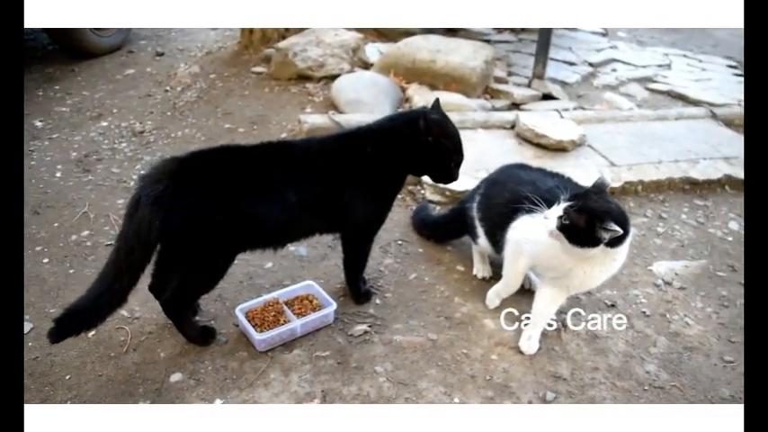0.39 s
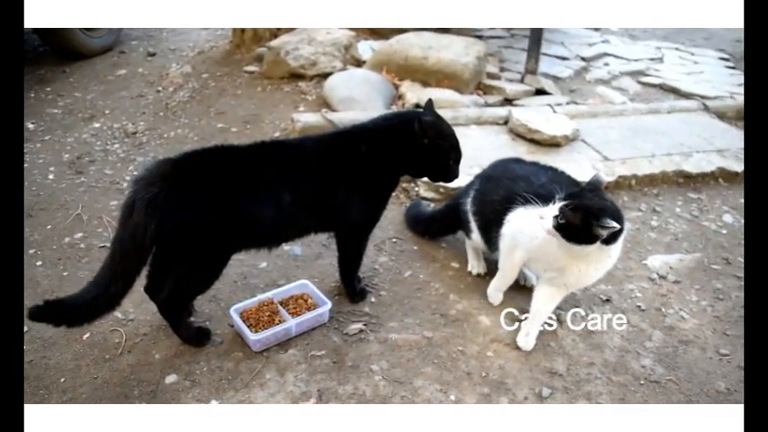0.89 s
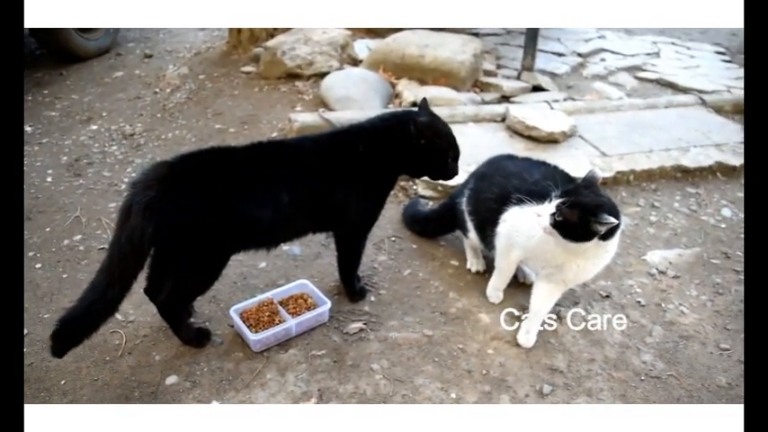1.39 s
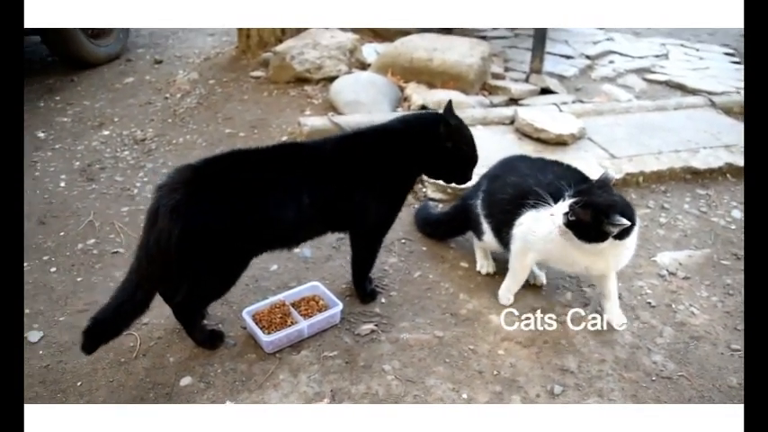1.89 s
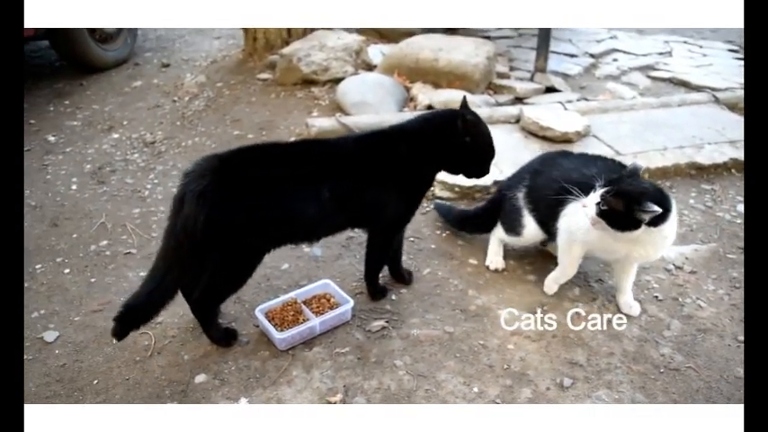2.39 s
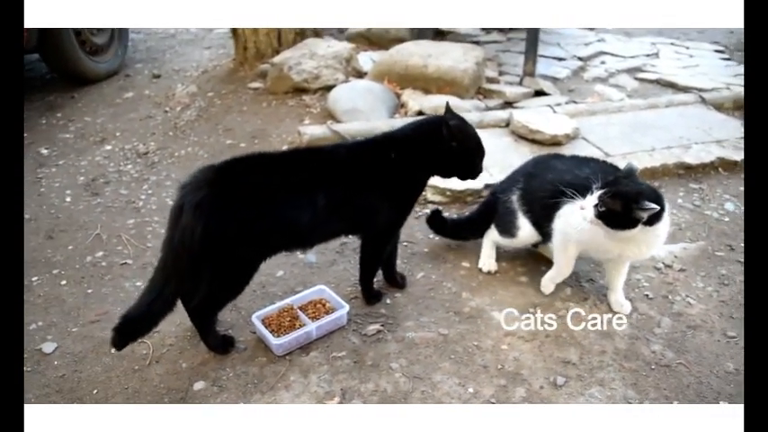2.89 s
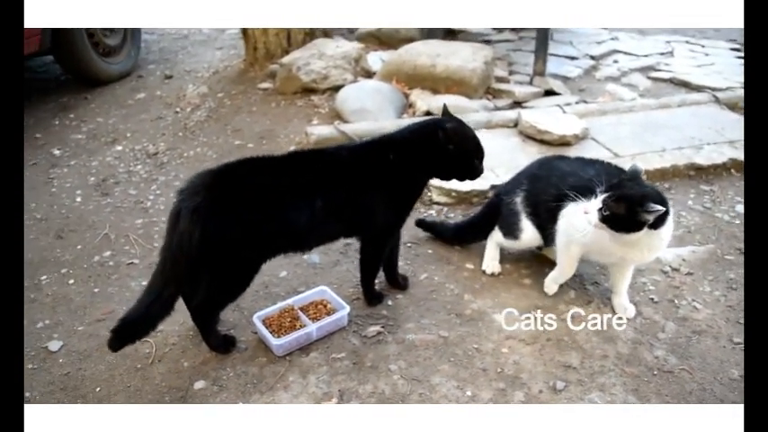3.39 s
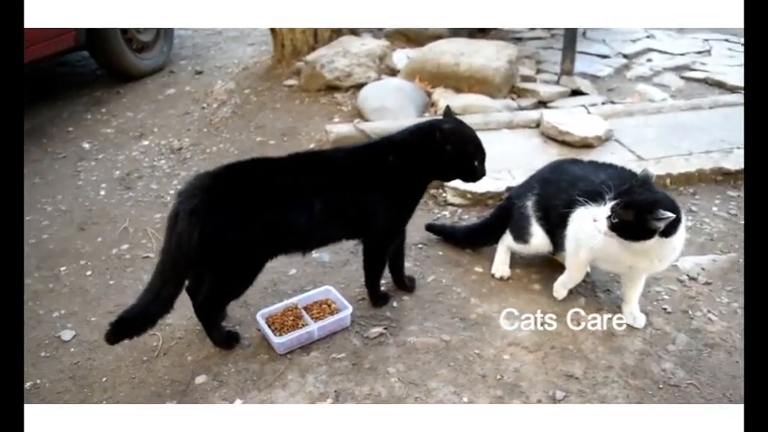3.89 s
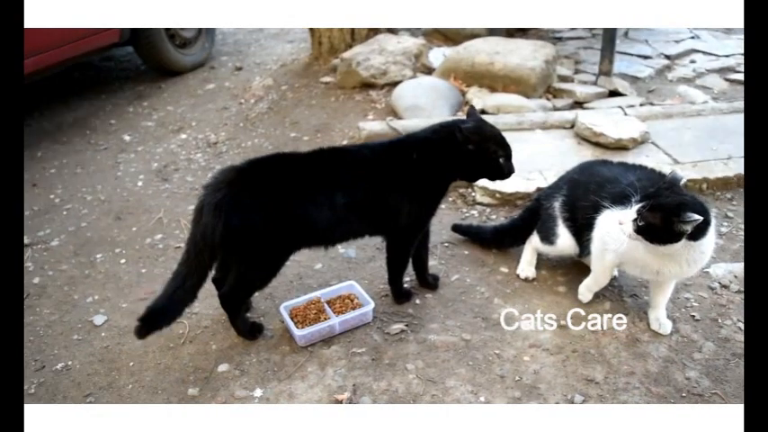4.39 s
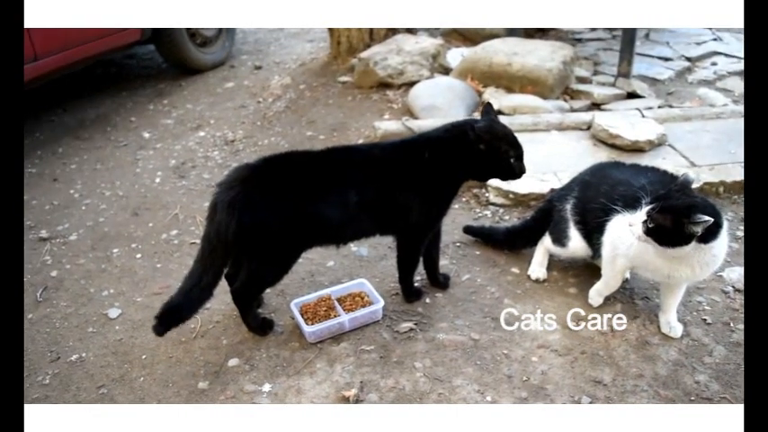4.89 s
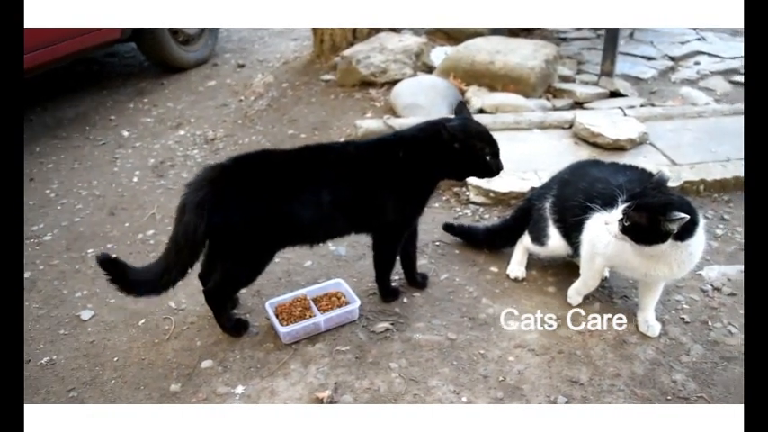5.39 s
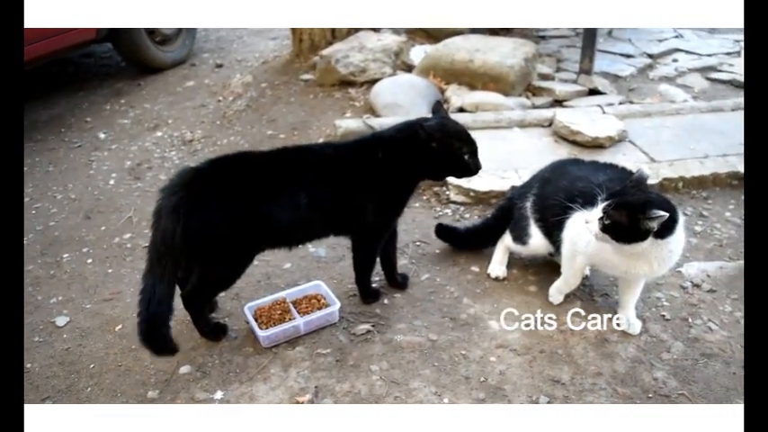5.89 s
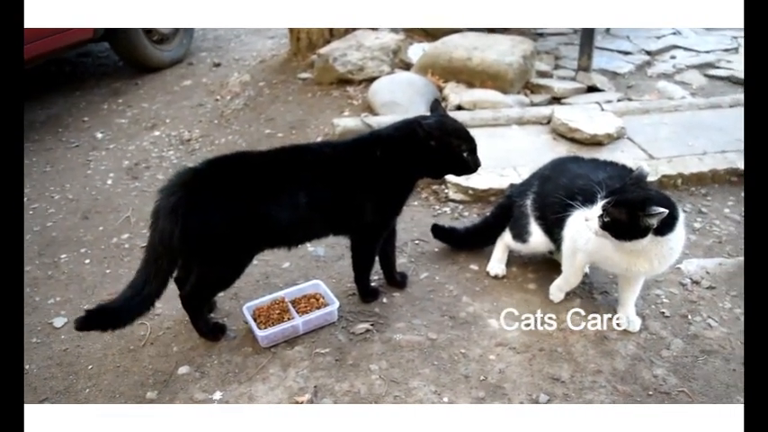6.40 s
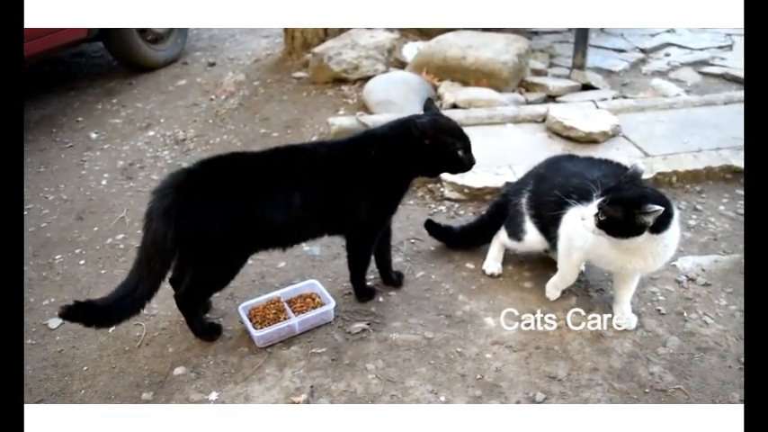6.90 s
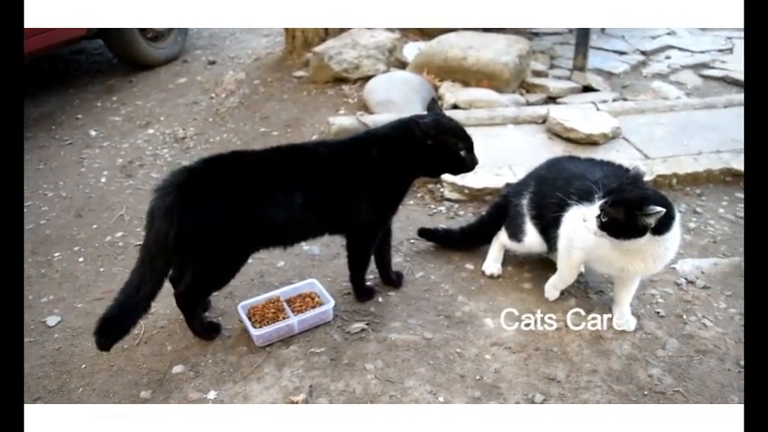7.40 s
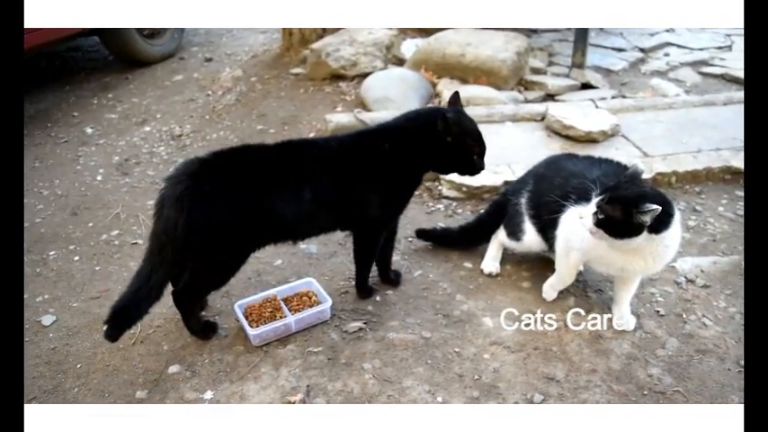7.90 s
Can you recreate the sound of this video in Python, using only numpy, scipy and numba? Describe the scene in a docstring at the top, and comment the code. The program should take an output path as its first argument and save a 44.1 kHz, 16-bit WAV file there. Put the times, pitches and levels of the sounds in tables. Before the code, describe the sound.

A cat's harsh, strained yowl falls away close by, then longer rising and falling calls follow with quiet gaps in an open yard.

```python
"""Yowling cats in a yard

Cats yowl close by on bare ground, in long rising and falling calls: fold partials through nose, throat and mouth.
Under strain a second, slower vibration joins and scatters side tones through the mouth.
Grit ticks, a hollow tap and a tail brushing the dust are decaying sines and swells of band noise.
A distant motor hums as wavering sines; insects, air and wind on the microphone are filtered noise."""
import sys
import numpy as np
from scipy import signal
from scipy.fft import rfft, irfft
from scipy.io import wavfile
from scipy.ndimage import uniform_filter1d
from numba import njit

SR = 44100
rng = np.random.default_rng(int(sys.argv[2]) if len(sys.argv) > 2 else 0)


def generate_wav(sig):
    """Save sig (samples, or channels by samples) to the path in sys.argv[1] as 16-bit PCM at SR."""
    pcm = np.round(np.clip(np.atleast_2d(sig).T, -1, 1) * 32767).astype(np.int16)
    wavfile.write(sys.argv[1], SR, pcm)


def makeup_ratio(level_db):
    """Linear amplitude ratio for a level in decibels (20 dB per factor of ten)."""
    decades = np.asarray(level_db, float) / 20
    return 10 ** decades


N = 354116
T = np.arange(N) / SR
SIDE = np.array([[1], [-1]])  # sign of the side signal, left and right


@njit
def svf(x, hz, width_hz):
    """State-variable band-pass with a moving centre, gain 1 at the centre."""
    y, band, low = np.empty(len(x)), 0., 0.
    for i in range(len(x)):
        g, k = np.tan(np.pi * hz[i] / SR), width_hz / hz[i]
        v = (band + g * (x[i] - low)) / (1 + g * (g + k))
        band, low, y[i] = 2 * v - band, low + 2 * g * v, k * v
    return y


def ring(x, hz, width_hz):
    """A resonance with steep flanks: three equal band-passes in series."""
    hz = hz + np.zeros(len(x))
    for _ in range(3):
        x = svf(x, hz, 1. * width_hz)
    return x


def even(x, hold_s=0.051):
    """Brings the slow level to rms 1, keeping the fast beats."""
    return x / np.sqrt(uniform_filter1d(x ** 2, int(hold_s * SR)) + 1e-12)


def walk(rate_hz, count):
    """Smooth chance with spread near 1, a new value about rate_hz times a second."""
    knots = rng.standard_normal(int(count * rate_hz / SR) + 2)
    return 1.21 * np.interp(np.arange(count) * rate_hz / SR, np.arange(len(knots)), knots)


# calls: t/s, nasal fundamental level/dB, throat level/dB, mouth level/dB, treble level/dB
CALLS = [
    [(-0.04, -26.5, -20.5, -11.5, -27), (0.158, -33, -12.5, -16, -42.5), (0.254, -34, -15, -23.5, -44),
     (0.33, -34.5, -25, -32, -48.5), (0.405, -43, -28.5, -42, -50), (0.425, -51, -49, -50, -66)],
    [(1.42, -54, -64, -48, -63), (1.45, -40.5, -47, -62, -55), (1.528, -41, -27, -39, -55),
     (1.6, -48, -32, -48, -54.5), (1.64, -34.5, -22.5, -39, -52.5), (1.704, -42.5, -23, -39, -51.5),
     (1.776, -44.5, -10.5, -30, -48), (1.874, -40, -16.5, -21.5, -52.5), (1.95, -42.5, -18, -17, -38.5),
     (2.014, -34, -22.5, -15.5, -25), (2.17, -39, -27.5, -16, -27.5), (2.32, -35.5, -20.5, -15, -27),
     (2.5, -33, -20, -16, -39), (2.632, -40, -17.5, -17.5, -42.5), (2.684, -43, -13.5, -24.5, -48.5),
     (2.776, -36, -30.5, -39.5, -53.5), (2.838, -42, -29, -39, -51.5), (2.88, -36.5, -37, -41, -59.5),
     (2.96, -38.5, -51, -61, -66.5), (3.05, -50, -68, -72, -69), (3.12, -45, -72, -75, -70),
     (3.25, -45.5, -78, -79, -68), (3.275, -63, -77, -78, -63.5)],
    [(4.62, -52, -68, -82, -69.5), (4.66, -47, -56, -71, -74), (4.73, -51, -35, -61, -67),
     (4.84, -44, -26.5, -46.5, -61), (4.99, -41.5, -44.5, -61, -68), (5.1, -46.5, -28, -49.5, -55),
     (5.22, -53, -23.5, -46.5, -57.5), (5.36, -51, -24.5, -46.5, -50.5), (5.6, -35, -49, -58, -57),
     (5.69, -52, -50.5, -77, -58.5), (5.77, -39, -50.5, -62, -60), (5.86, -40, -27, -48.5, -56),
     (6.01, -49.5, -23, -48.5, -54.5), (6.17, -41.5, -25, -42.5, -53.5), (6.28, -41, -32.5, -46.5, -53),
     (6.37, -38.5, -29.5, -61, -56.5), (6.57, -37.5, -46, -64, -70), (6.64, -50, -69, -75, -78),
     (6.9, -43.5, -66, -78, -80.5), (6.97, -53, -67, -74, -67)],
    [(7.87, -54, -49.5, -62, -76), (7.94, -55.5, -27.5, -52, -64), (7.99, -46, -16, -38.5, -54.5),
     (8.07, -40, -19, -21, -51)],
]
# hoarseness of each call outside the strained spells: hoarseness [0-1]
CALM_HOARSENESS = (.25, .08, .02, .04)
# mouth resonance, which climbs as the jaw drops: t/s, f/Hz
MOUTH_TRACK = [(0, 2070), (.16, 1944), (.3, 2090), (.43, 2150), (1.42, 1650), (1.68, 1990), (1.78, 2270),
               (1.9, 2320), (1.96, 2020), (2.1, 2266), (2.3, 2080), (2.44, 1808), (2.63, 1635), (2.7, 1980),
               (2.85, 1780), (4.7, 1670), (5.1, 2030), (5.6, 1730), (5.9, 2080), (6.2, 1830), (6.6, 1700),
               (7.87, 1800), (8.03, 2290)]
# breath grows with effort: treble level/dB, noise against one partial [ratio]
BREATH_NOISE = [(-60, 2.2), (-52, 4.5), (-40, 6)]
# treble resonances: f/Hz, width of one filter stage/Hz, relative level/dB
TREBLE_RINGS = [(4750, 390, 5.5), (5800, 860, -1.5), (7380, 1100, -6.5), (8900, 3500, -13.5),
                (11060, 1400, -14.5)]


def cats():
    """Each call: a soft fundamental through the nose, the rest through throat and mouth; breathier treble."""
    throat_hz, throat_width_hz = 1193, 993
    front_hz, front_width_hz = 2671, 864
    lips_hz, lips_width_hz = 3820, 1500
    mouth_width_hz, nose_flutter_db = 940, 2.5
    pocket_hz, pocket_width_hz, pocket_depth = 4300., 380., .9  # a side pocket of the throat swallows this band
    out = np.zeros(N)
    for call, calm in zip(CALLS, CALM_HOARSENESS):
        s, *columns = np.transpose(call)
        span = slice(max(int(s[0] * SR), 0), min(int(s[-1] * SR), N))
        t = T[span]
        nose_db, throat_db, mouth_db, treble_db = (np.interp(t, s, c) for c in columns)
        mouth_hz = np.interp(t, *np.transpose(MOUTH_TRACK))
        front_db = -17 + 1.54 * (mouth_db + 15)  # front of the mouth
        lips_db = -14.5 + 1.555 * (treble_db + 25)

        source, nose = folds(t, calm)
        breath = np.interp(treble_db, *np.transpose(BREATH_NOISE)) * rng.standard_normal(len(t))
        airy = source + breath
        airy = airy - pocket_depth * svf(airy, np.full(len(t), pocket_hz), pocket_width_hz)

        def steep(x, hz, width_hz):
            """A double ring, six band-passes in all."""
            return ring(ring(x, hz, width_hz), hz, width_hz)

        treble = sum(makeup_ratio(db) * ring(airy, hz, width_hz) for hz, width_hz, db in TREBLE_RINGS)
        out[span] += makeup_ratio(nose_db + nose_flutter_db * walk(18, len(t))) * np.sqrt(2) * nose
        out[span] += makeup_ratio(throat_db) * even(steep(source, throat_hz, throat_width_hz), 0.02)
        out[span] += makeup_ratio(mouth_db) * even(steep(source, mouth_hz, mouth_width_hz))
        out[span] += makeup_ratio(front_db) * even(steep(source, front_hz, front_width_hz))
        out[span] += makeup_ratio(lips_db) * even(ring(airy, lips_hz, lips_width_hz))
        out[span] += makeup_ratio(treble_db - 2.5) * even(treble)
    return out


# rate of the second vibration: t/s, f/Hz
SECOND_RATE = [(0, 489.4), (.14, 468.4), (.2, 443.5), (.26, 396.8), (1.9, 391.8), (2.0, 500.7),
               (2.12, 511.2), (2.26, 482.5), (2.48, 461.4), (2.56, 454), (2.65, 401), (2.81, 364),
               (4.85, 391), (5.1, 365), (5.2, 413), (8.03, 407)]
# every other fold cycle is weaker, which sounds the half pitch: start t/s, end t/s, relative level/dB
DOUBLED_CYCLES = [(0.281, 0.386, -4.5), (2.641, 2.857, -10)]
# side tones: multiple of the pitch [1], multiple of the second rate [1], relative level/dB
SIDE_PARTIALS = [(0, 2, -25), (1, 1, 2), (2, -1, -29), (1, 2, -13), (3, -2, -10.5), (2, 1, -9.5),
                 (3, -1, -2.5), (4, -2, 0.5), (1, 3, -9), (2, 2, 7.5), (4, -1, 6.5), (3, 1, 8.5),
                 (5, -2, 7), (2, 3, 5.5), (5, -3, -3.5), (1, 4, 9.5), (4, 1, 9.5), (3, 2, -3.5),
                 (3, 3, -5.5), (5, -1, -7), (6, -2, 9), (4, 2, 4), (5, 1, -4.5)]


def folds(t, calm):
    """Pitch harmonics, half tones where cycles double, side tones of the second vibration, and breath."""
    hz, creak = pitch(t)
    side_db, hoarse = strain(t, calm)
    hoarse = np.clip(hoarse + creak, 0, 1)
    second_hz = np.interp(t, *np.transpose(SECOND_RATE))
    phase = 2 * np.pi * np.cumsum(hz) / SR + (.015 + .32 * hoarse) * walk(250, len(t))
    second = 2 * np.pi * np.cumsum(second_hz) / SR + .5 * hoarse * walk(150, len(t))

    def tone(p, f):
        """One partial that wavers in level and is fringed with noise as the voice gets hoarse."""
        fringe = 1.02 * hoarse * walk(220, len(t)) * np.cos(p)
        waver = makeup_ratio((2.5 + 3.1 * hoarse) * walk(24.81, len(t)))
        return (np.sin(p + 2 * np.pi * rng.random()) + fringe) * waver * (f < 12500)

    # two cycles of the pitch nearly match three of the second vibration: a slow beat fringes the partials
    beat = 2 * phase - 3 * second
    nose = np.cos(phase) + 2.5 * hoarse * makeup_ratio(side_db) * np.cos(phase + beat)
    nose += makeup_ratio(side_db - 2.5) * (1 - hoarse) ** 2 * np.cos(second)
    # in the hoarse low register the second harmonic passes the nose as well
    low = np.clip((430 - hz) / 30., 0, 1)
    nose += low * np.clip((hoarse - .06) / .06, 0, 1) * np.cos(2 * phase)

    # the second vibration draws its energy from the odd harmonics
    odd = np.clip(1 - 1.6 * makeup_ratio(side_db / 3), .08, 1)
    source = sum(tone(m * phase, m * hz) * (odd if m % 2 else 1) for m in range(2, 24))
    for start, end, db in DOUBLED_CYCLES:
        gate = np.interp(t, [start - .01, start + 0.021, end - .03, end], [0, 1, 1, 0])
        if gate.any():
            source += makeup_ratio(db) * gate * sum(tone((m + .5) * phase, m * hz) for m in range(18))
    for m, n, db in SIDE_PARTIALS:
        source += makeup_ratio(db + side_db) * tone(m * phase + n * second, m * hz)
    source *= 1 + .55 * makeup_ratio(side_db) * np.cos(beat)
    breath = (0.5 + 3.2 * hoarse) * rng.standard_normal(len(t))
    return source + breath, nose


# pitch of the folds: t/s, f/Hz
SUNG_PITCH = [(0, 890), (.07, 863), (.11, 821), (.2, 765), (.26, 686), (.39, 612), (.41, 570), (.43, 480),
              (1.42, 400), (1.44, 430), (1.47, 515), (1.612, 535), (1.672, 565), (1.71, 570), (1.74, 597),
              (1.89, 642), (1.98, 765), (2.07, 822), (2.2, 825), (2.26, 772), (2.36, 773), (2.45, 742),
              (2.475, 796), (2.56, 756), (2.66, 660), (2.76, 642), (2.87, 597), (2.98, 523), (3.06, 500),
              (3.1, 522), (3.2, 512), (3.245, 480), (3.28, 330), (4.62, 300), (4.66, 435), (4.7, 502),
              (4.84, 585), (4.92, 607), (5.2, 624), (5.57, 605), (5.7, 605), (5.77, 588), (5.88, 603),
              (6, 615), (6.2, 603), (6.6, 555), (6.7, 510), (6.85, 465), (6.93, 385), (6.97, 350),
              (7.87, 430), (7.9, 487), (7.93, 537), (7.98, 555), (8.03, 620)]
# drops into a low creaky register: start t/s, end t/s, first f/Hz, last f/Hz
CREAK_DROPS = [(1.491, 1.577, 330, 385), (1.615, 1.668, 383, 417)]


def pitch(t):
    """The sung pitch with its drops into the creaky register, and the hoarseness that these add."""
    creak_hoarse, crack_hoarse, crack_s = 0.38, 0.34, 0.013
    hz, hoarse = np.interp(t, *np.transpose(SUNG_PITCH)), 0 * t
    for start, end, first_hz, last_hz in CREAK_DROPS:
        low = np.interp(t, [start - .003, start + .003, end - .003, end + .003], [0, 1, 1, 0])
        hz = hz + low * (np.interp(t, [start, end], [first_hz, last_hz]) - hz)
        crack = np.exp(-((t - start - crack_s) / crack_s) ** 2)
        hoarse = hoarse + creak_hoarse * low + crack_hoarse * crack
    return hz, hoarse


# spells when the second vibration joins: start t/s, end t/s, side tone level/dB, hoarseness [0-1]
STRAINED_SPELLS = [(0, 0.175, -5, 0.37), (0.167, 0.276, -5, 0.14), (1.683, 1.732, -4, 0.44),
                   (1.786, 1.934, -12, 0.06), (1.979, 2.04, -13.5, 0.03), (2.048, 2.23, -12, 0.48),
                   (2.222, 2.62, -6, 0.24), (2.62, 2.696, -15.5, 0.08), (2.797, 2.828, -6, .2),
                   (4.74, 4.776, -19, 0.65), (4.798, 4.887, -24, 0), (5.057, 5.416, -20.5, 0),
                   (5.9, 6.2, -29, 0), (7.952, 7.971, -8.5, 0.25), (7.99, 8.03, -23, 0)]


def strain(t, calm):
    """Level of the side tones and hoarseness: held through each spell, fading on both sides."""
    fade_db_per_s, slack_db = 1100, -45.
    side_db, hoarse = np.full(len(t), slack_db), np.full(len(t), 1. * calm)
    for start, end, db, rough in STRAINED_SPELLS:
        fade_db = fade_db_per_s * np.maximum(0, np.maximum(start - t, t - end))
        side_db = np.maximum(side_db, db - fade_db)
        hoarse = hoarse + (rough - hoarse) * makeup_ratio(-fade_db)
    return side_db, hoarse


# grit ticks: t/s, peak level/dB, f/Hz
GRIT_TICKS = [(0.3374, -30.5, 3840), (0.572, -41, 3380), (0.593, -43.5, 3060), (0.965, -39.5, 3320),
              (3.691, -36.5, 3600), (3.9566, -44, 3000), (5.1898, -38, 2930), (6.562, -27, 4060)]


def grit():
    """Each tick is a sine under a sharp rise and exponential fall."""
    out, decay_s = np.zeros(N), .0005
    for s, db, hz in GRIT_TICKS:
        age = np.clip(T - s, 0, 1)
        envelope = np.e * age / decay_s * np.exp(-age / decay_s)  # peak 1
        out += makeup_ratio(db) * np.sin(2 * np.pi * hz * age) * envelope
    return out


# one hollow tap: t/s, f/Hz, approximate peak level/dB, t60/s
HOLLOW_TAP = (3.789, 380, -29, .05)


def hollow_tap():
    """A low sine with a rounded onset and a short exponential decay."""
    s, hz, db, t60_s = HOLLOW_TAP
    age = np.clip(T - s, 0, 1)
    envelope = 3 * (1 - np.exp(-age / .004)) * np.exp(-np.log(1000) * age / t60_s)  # peak near 1
    return makeup_ratio(db) * np.sin(2 * np.pi * hz * age) * envelope


# a tail brushing the dust: centre t/s, half length to 1/e/s, centre f/Hz, level/dB
TAIL_SWISHES = [(1.3, .15, 2200, -60), (5.43, .1, 4000, -50.5), (6.27, .08, 4100, -54)]


def tail_swishes():
    """Broad band noise that swells and fades."""
    out = np.zeros(N)
    for s, half_s, hz, db in TAIL_SWISHES:
        hiss = svf(rng.standard_normal(N), np.full(N, 1. * hz), 1.1 * hz)
        out += makeup_ratio(db) * np.exp(-((T - s) / half_s) ** 2) * even(hiss)
    return out


# distant motor: start t/s, end t/s, mean f/Hz, mean level/dB
MOTOR_HUMS = [(6.75, 7.35, 160, -50), (6.6, 16, 220, -56.5)]


def motor():
    """Gated sines that waver in pitch and level."""
    out = np.zeros(N)
    for start, end, hz, db in MOTOR_HUMS:
        gate = np.interp(T, [start, start + 0.12, end - .1, end + 0.042], [0, 1, 1, 0])
        phase = 2 * np.pi * np.cumsum(hz + 3 * walk(7.4, N)) / SR
        out += makeup_ratio(db + 2.0 * walk(8.7, N)) * gate * np.sqrt(2) * np.sin(phase)
    return out


# insects: f/Hz, width of one filter stage/Hz, mean level of mid and of side/dB
INSECT_BANDS = [(3280, 44, -80.5), (4356, 300, -71), (6156, 700, -66.5), (7440, 1500, -68.5),
                (9400, 980, -75.5)]


def insects():
    """Bands of noise with independent mid and side, drifting in level."""
    out = np.zeros((2, N))
    for hz, width_hz, db in INSECT_BANDS:
        mid, other = (even(ring(rng.standard_normal(N), hz, width_hz), 0.91) for _ in range(2))
        out += makeup_ratio(db + 0.7 * walk(2.8, N)) * (mid + SIDE * other)
    return out


# wind on the microphone: centre t/s, half length to 1/e/s, mean level/dB
WIND_GUSTS = [(.25, 0.2, -42), (.5, 0.38, -48.5), (1.22, 0.14, -48), (1.5, 0.047, -44.5),
              (1.67, 0.047, -40), (2.6, 0.46, -49), (6.5, 0.26, -55.5), (7.95, 0.38, -60.5)]


def wind():
    """Bass noise that swells in gusts over a steady breeze, stronger on the right."""
    breeze_db = -65
    band = signal.butter(2, [30, 190], "band", fs=SR, output="sos")
    rumble = signal.sosfilt(band, rng.standard_normal((2, N)))
    rumble = (rumble[0] + .6 * SIDE * rumble[1]) / np.std(rumble)
    gusts = makeup_ratio(breeze_db) + sum(makeup_ratio(db) * np.exp(-((T - s) / half_s) ** 2) for s, half_s, db in WIND_GUSTS)
    return gusts * makeup_ratio(1.1 * walk(7, N)) * rumble * makeup_ratio(np.array([[-1.5], [1.5]]))


# spectrum of the air, scaled as a whole afterwards: f/Hz, relative density/dB per Hz
AIR_SPECTRUM = [(20, -29.5), (40, -5), (90, -1.5), (200, -5), (400, -10.5), (800, -10), (1500, -16),
                (2800, -22), (4500, -28), (5300, -30.5), (7000, -26.5), (9000, -33), (11000, -35),
                (12500, -41)]


def air():
    """Distant smooth noise that widens towards the treble."""
    air_db = -48.5
    f = np.fft.rfftfreq(N, 1 / SR) + 1
    hz, db = np.transpose(AIR_SPECTRUM)
    shape = makeup_ratio(np.interp(np.log(f), np.log(hz), db))
    side_width = np.clip(.05 + f / 9000., 0, 1)
    mid, other = (irfft(rfft(rng.standard_normal(N)) * shape * w, N) for w in (1, side_width))
    noise = mid + SIDE * other
    return makeup_ratio(air_db + .6 * walk(3, N)) * noise / np.std(noise)


def echoes_of(near):
    """Short echoes off ground, stones and walls: convolution with decaying noise in each channel."""
    t60_s = 0.28
    age = np.arange(int(.4 * SR)) / SR
    echoes = rng.standard_normal((2, len(age))) * np.exp(-np.log(1000) * age / t60_s) * (age > .002)
    echoes /= np.sqrt(np.sum(echoes ** 2, 1, keepdims=True))
    wet = signal.fftconvolve(near[None], echoes)[:, :N]
    # small stones scatter the treble far more than the middle
    band = signal.butter(2, [6000, 10000], "band", fs=SR, output="sos")
    return wet + 4.5 * signal.sosfilt(band, wet)


def scene():
    """Near sounds and motor, slightly right of centre, with their echoes over the yard."""
    near = cats() + grit() + hollow_tap() + tail_swishes() + motor()
    direct = near * makeup_ratio(np.array([[-.3], [.3]]))
    return direct + makeup_ratio(-15.0) * echoes_of(near) + insects() + wind() + air()


def roll_off(x):
    """The treble ends steeply here."""
    return signal.sosfilt(signal.butter(12, 12500, fs=SR, output="sos"), x)


def record(dry):
    """The handheld phone rounds the loudest peaks, as a tanh curve."""
    mix = np.tanh(.6 * dry) / .6
    return roll_off(mix)


dry = scene()
out = record(dry)
generate_wav(out)
```